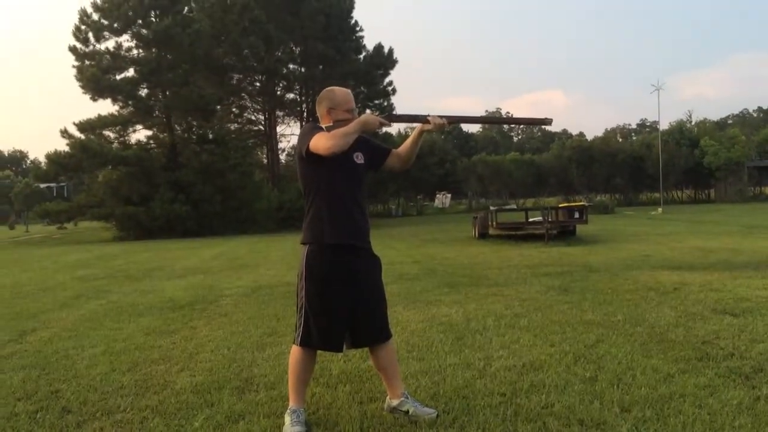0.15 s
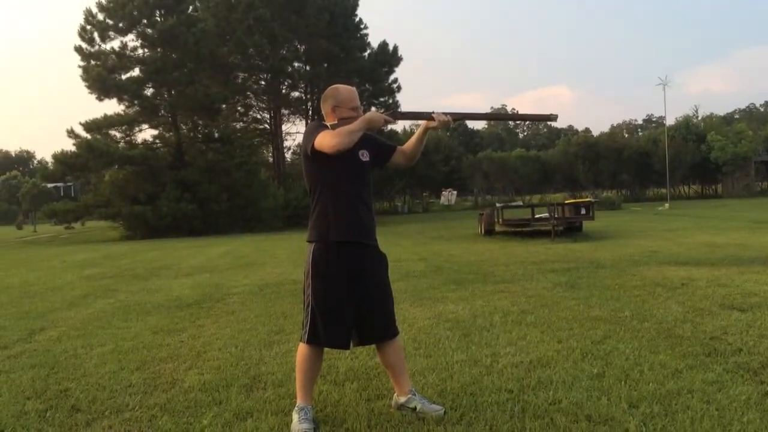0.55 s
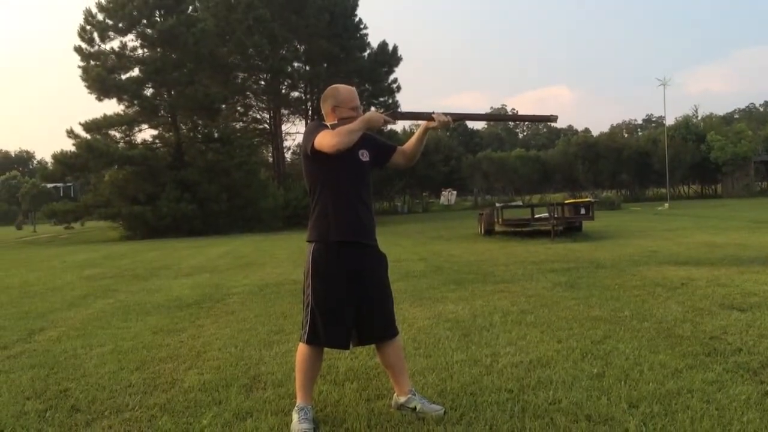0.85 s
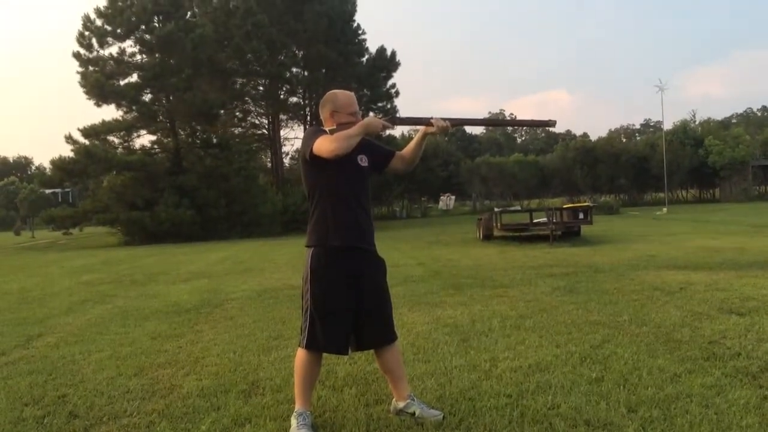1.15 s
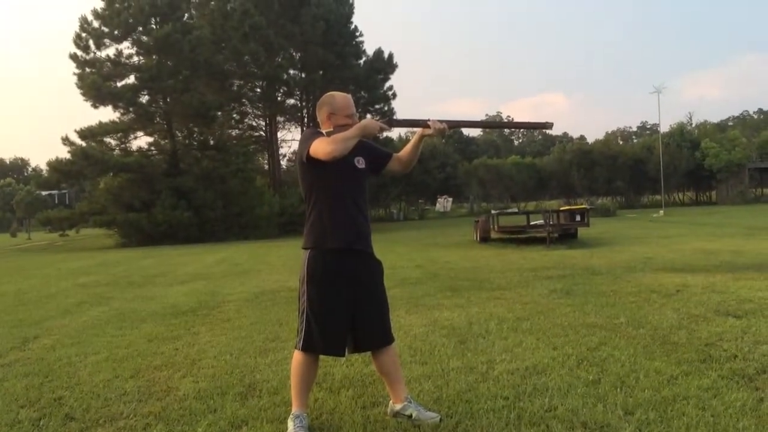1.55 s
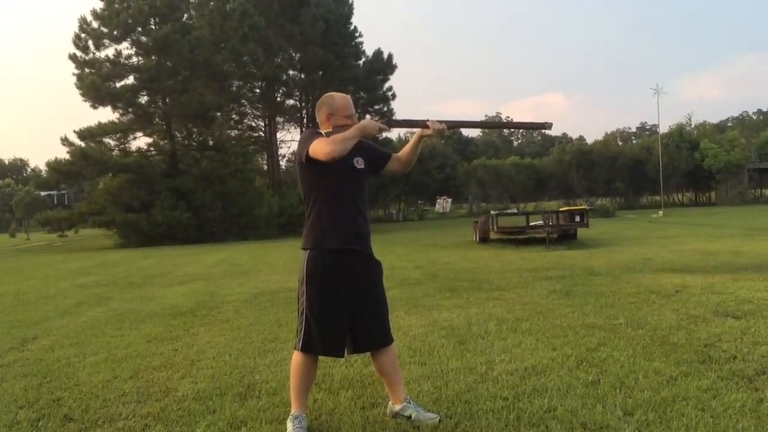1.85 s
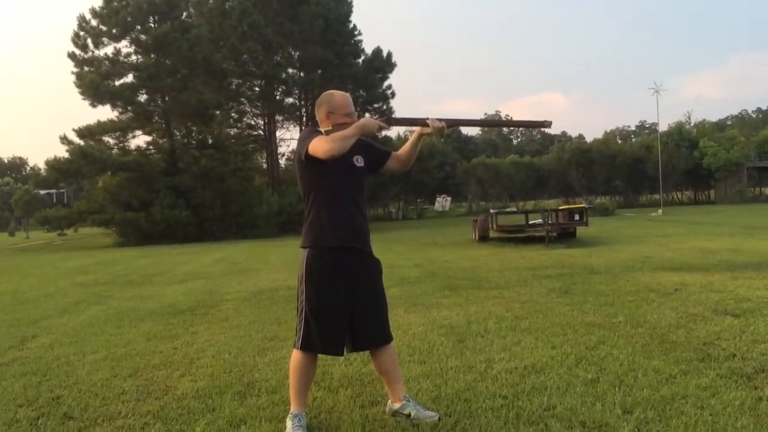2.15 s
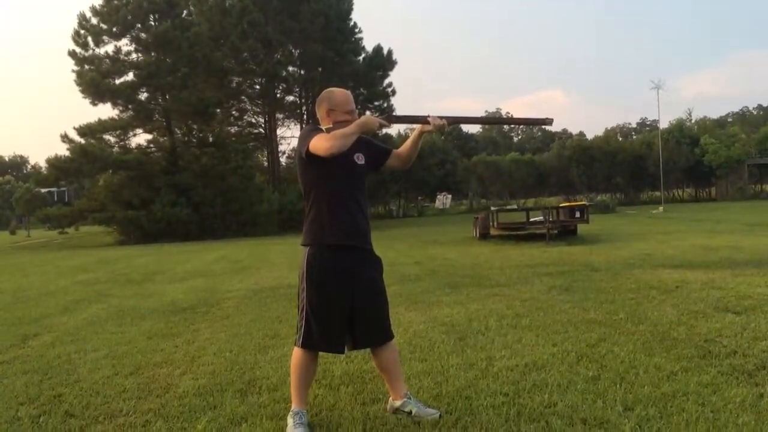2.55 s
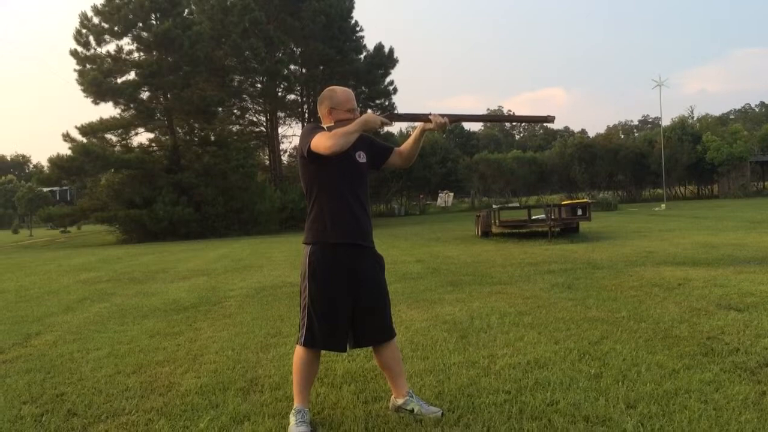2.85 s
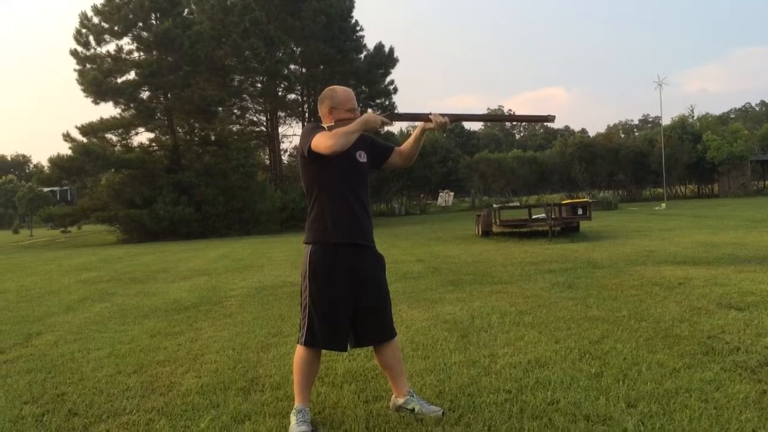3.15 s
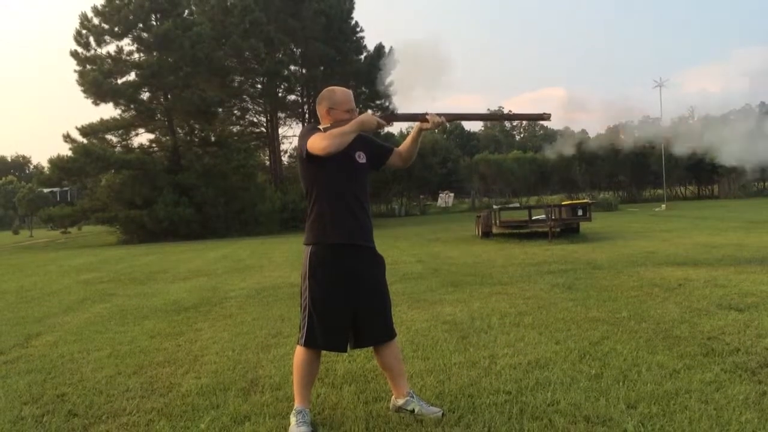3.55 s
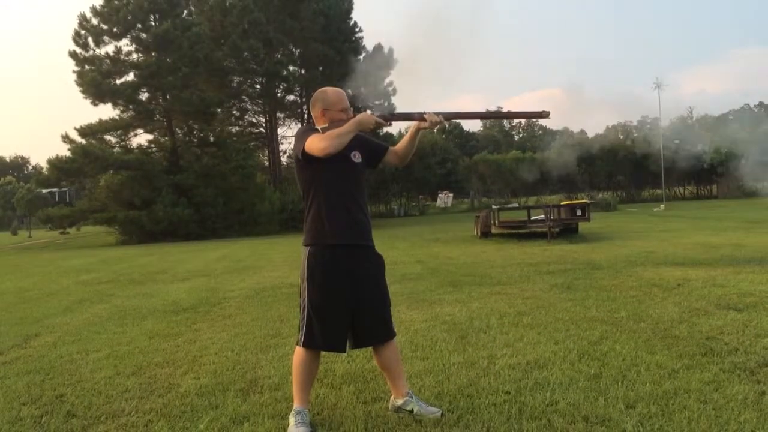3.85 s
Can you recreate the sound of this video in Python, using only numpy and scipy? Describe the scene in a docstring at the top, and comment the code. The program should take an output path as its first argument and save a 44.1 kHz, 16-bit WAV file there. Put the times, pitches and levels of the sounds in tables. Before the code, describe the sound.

One loud flintlock rifle shot with a short echo breaks faint outdoor insect noise.

```python
"""A flintlock rifle is fired on a quiet summer lawn, a few metres away.
First, insects hiss and trill over a low outdoor rumble, with faint chirps; one buzzes close by.
At 2.7 s the trigger ticks. Near 3.5 s the flint strikes steel and the priming powder fizzes.
A pop comes from the touch hole, then the main charge goes off with a burst of gas from the muzzle.
The blast comes back as separate slaps from things nearby and as a roll from the tree line."""
import sys
import numpy as np
from scipy import signal
from scipy.fft import rfft, irfft
from scipy.io import wavfile

SR = 44100
rng = np.random.default_rng(int(sys.argv[2]) if len(sys.argv) > 2 else 0)


def int16_out(signal):
    """Quantize to a 16-bit WAV file."""
    q = np.round(np.clip(np.atleast_2d(signal).T, -1, 1) * 32767)
    wavfile.write(sys.argv[1], SR, q.astype(np.int16))


N = 176400
T = np.arange(N) / SR
HZ = np.fft.rfftfreq(N, 1 / SR)


def amp(db):
    """Turns decibels into a number to multiply by."""
    return 10 ** (np.asarray(db) / 20)


def unit(x):
    """Scales a sound to an average (rms) size of one."""
    return x / np.sqrt(np.mean(x ** 2) + 1e-20)


def gain_at(points, hz):
    """Looks up how strong each frequency is in a table of f/Hz, level/dB."""
    f, db = np.transpose(points)
    return amp(np.interp(np.log(hz + 1), np.log(f + 1), db))


def level(points):
    """Loudness over time from a table of t/s, level/dB; silent before and after."""
    s, db = np.transpose(points)
    return amp(np.interp(T, s, db, left=-140, right=-140))


def noise(gain):
    """Noise whose mix of low and high frequencies follows gain."""
    return unit(irfft(rfft(rng.standard_normal(N)) * gain, N))


def band(hz, octaves):
    """Noise gathered around one frequency."""
    return noise(np.exp(-.5 * (np.log2((HZ + 1) / hz) / octaves) ** 2))


def wander(seconds):
    """A smooth random wobble; more seconds make it slower."""
    return noise(np.exp(-np.minimum((HZ * seconds) ** 2, 50)))


def swell(centre, width):
    """A smooth rise and fall around one moment."""
    return np.exp(-.5 * np.minimum(((T - centre) / width) ** 2, 100))


def burst(start, decay):
    """A sudden start that dies away."""
    return (T >= start) * np.exp(-np.clip((T - start) / decay, 0, 50))


def ring(start, hz, t60):
    """One note of a struck object, fading by 60 dB in t60 seconds."""
    return burst(start, t60 / np.log(1000)) * np.sin(2 * np.pi * hz * (T - start))


def high_pass(x, hz, order):
    """Takes away the bass below hz."""
    return signal.sosfilt(signal.butter(order, hz, "highpass", fs=SR, output="sos"), x)


# tone of the outdoor rumble: f/Hz, relative level/dB
RUMBLE_TONE = [(20, -14.5), (40, -6.5), (64, 1), (114, 0.5), (207, -8.5), (350, -17), (593, -29),
               (1000, -29.5), (1800, -30), (2730, -34.5), (4500, -38.5), (6000, -37.5), (7800, -63)]
# tone of the thin hiss: f/Hz, relative level/dB
HISS_TONE = [(4000, -17), (5500, -1.5), (10500, 6), (11700, -22), (12700, 1), (15000, 3), (16000, -8)]
def open_air():
    """The open air rumbles low, with a thin hiss on top."""
    return amp(-59) * noise(gain_at(RUMBLE_TONE, HZ)) + amp(-80) * noise(gain_at(HISS_TONE, HZ))


# tone of many insects together: f/Hz, relative level/dB
CHORUS_TONE = [(5600, -38), (6200, -15), (6600, -9), (7000, 3.5), (7400, 0), (7800, 3.5), (8300, 0),
               (8800, -12.5), (9600, -4), (10500, -3.5), (10950, -17), (11300, -51)]
def insect_chorus():
    """Many insects blend into one high, shimmering hiss."""
    shimmer_db = 0.68 * wander(.012) + 0.45 * wander(.3)
    return noise(gain_at(CHORUS_TONE, HZ)) * amp(-61 + shimmer_db)


# loudness of a far trill: t/s, level/dB
TRILL_LEVELS = [(0, -74), (0.35, -82), (0.75, -78), (1.05, -82.5), (1.7, -83.5), (2.2, -88.5), (3.4, -87.5)]
def trill():
    """A far trill flutters and slowly grows fainter."""
    flutter = amp(1.5 * wander(0.055))
    return level(TRILL_LEVELS) * band(hz=3650, octaves=0.19) * flutter


# distant chirps: t/s, width/s, level/dB, f/Hz, spread/octaves
FAR_CHIRPS = [(0.275, 0.016, -70, 2500, 0.48), (0.508, 0.029, -77, 3100, 0.36),
              (0.69, .016, -74, 2980, 0.42), (0.895, 0.018, -75, 4230, .08),
              (1.552, 0.011, -69.5, 2980, 0.14), (2.178, 0.011, -75, 2600, 0.38),
              (2.49, 0.016, -71, 2540, 0.15), (2.858, 0.0088, -66, 2900, 0.23),
              (3.321, 0.013, -71, 2750, .26)]
def chirps():
    """Each faint chirp is a short swell of high noise with a lower rasp."""
    rasp = amp(-5) * band(hz=2080, octaves=0.64)
    return sum(amp(db) * swell(s, width) * (band(hz, octaves) + rasp)
               for s, width, db, hz, octaves in FAR_CHIRPS)


# one insect flying close by: t/s, wingbeat f/Hz, level/dB
FLIGHT = [(0.62, 229, -87), (0.72, 222.6, -73.5), (0.82, 227.3, -74.5), (0.9, 231.4, -75.5),
          (0.98, 226.4, -73.5), (1.12, 229, -76), (1.17, 227, -73), (1.28, 230, -77), (1.35, 225, -75.5),
          (1.46, 218, -83)]
# tone of its wings: f/Hz, relative level/dB
WING_TONE = [(2800, -20), (3400, -8), (3650, -4.5), (3900, -13), (4130, -1), (4350, -1.5), (4600, -10),
             (4800, -11), (5030, -5), (5600, -21)]
def insect_buzz():
    """Beating wings make high overtones, each swelling and fading as the insect moves."""
    s, hz, db = np.transpose(FLIGHT)
    wingbeat_hz = np.interp(T, s, hz) * (1 + .0035 * wander(.015))
    phase = 2 * np.pi * np.cumsum(wingbeat_hz) / SR
    tone = np.zeros(N)
    for k in range(14, 24):  # overtones: whole multiples of the wingbeat
        strength = gain_at(WING_TONE, k * hz.mean()) * amp(2.5 * wander(.08))
        tone += strength * np.sin(k * phase + 2 * np.pi * rng.random())
    return level(list(zip(s, db))) * unit(tone)


def trigger(start_s=2.719):
    """A small tick leaves a spring ringing."""
    tick = amp(-59.5) * burst(start_s, decay=0.0057) * band(hz=1700, octaves=.9)
    return tick + amp(-53) * ring(start_s, hz=1053, t60=0.17)


# flint hitting and steel snapping open: t/s, tick level/dB, ring level/dB, decay/s
LOCK_HITS = [(3.4732, -21, -37, 0.0024), (3.478, -23.5, -38, 0.0023), (3.4821, -13.5, -14, 0.0017),
             (3.4831, -17, -9.5, 0.0014), (3.4849, -15.5, -15, 0.0025), (3.4886, -26.5, -17.5, 0.0058)]
# notes the lock and stock ring with: f/Hz, relative level/dB, time to fade 60 dB/s
LOCK_NOTES = [(540, -14.5, 0.047), (840, -36, .025), (1050, -19, 0.035), (1220, -7, 0.046),
              (2064, 6, 0.037), (2440, -11, 0.049), (2804, 0.5, 0.022), (3910, -9, 0.033)]
# tone of the metal ticks: f/Hz, relative level/dB
METAL_TONE = [(300, -26), (1000, 4.5), (3000, -3), (5000, -10.5), (7200, 3), (8300, -3), (10000, 3.5),
              (12000, -1.5), (14500, 1), (16000, -0.5)]
def lock():
    """In the lock (the firing mechanism) the flint swings, scrapes steel and sets the rifle ringing."""
    hiss = noise(gain_at(METAL_TONE, HZ))
    ticks, knocks = np.zeros(N), np.zeros(N)
    for s, tick_db, ring_db, decay in LOCK_HITS:
        ticks += amp(tick_db) * burst(s, decay) * hiss
        knocks[round(s * SR)] += amp(ring_db)
    body = sum(amp(db) * ring(0, hz, t60) for hz, db, t60 in LOCK_NOTES)[:SR // 8]
    ringing = signal.oaconvolve(knocks, body / abs(body).max())[:N]  # each knock starts all the notes
    touching = T > LOCK_HITS[0][0]
    scrape = amp(-29) * touching * swell(3.479, 0.0033) * band(hz=2360, octaves=0.31)
    swing = amp(-62) * swell(3.464, 0.0058) * band(hz=2600, octaves=0.55)
    return high_pass(swing + ticks + ringing + scrape, hz=480, order=4)


# loudness of the burning powder: t/s, level/dB
FIZZ_LEVELS = [(3.48, -70), (3.492, -41), (3.51, -51), (3.535, -46), (3.552, -42), (3.562, -51),
               (3.572, -29), (3.59, -72)]
# tone of the burning powder: f/Hz, relative level/dB
FIZZ_TONE = [(59, -31), (100, -4), (1390, -13), (1550, -6), (5530, -22), (6990, -19), (12700, -15.5),
             (15000, -25), (16000, -40)]
def priming():
    """A pinch of powder fizzes as it burns, lighting the main charge."""
    return level(FIZZ_LEVELS) * noise(gain_at(FIZZ_TONE, HZ))


# pulses of air pressure: t/s, width/s, boom f/Hz, boom level/dB, crack level/dB, tick level/dB
PULSES = [(3.5636, 0.0017, 218, -27, -33, -44), (3.6093, 0.00057, 350, -23, -13.5, -33),
          (3.6347, 0.0028, 330, -42, -28, -34), (3.659, 0.0036, 333, -27.5, -24, -31),
          (3.6676, .0012, 420, -21, -15.5, -24), (3.673, 0.0033, 343, -26.5, -42, -50),
          (3.6988, 0.00059, 525, -4, -21, -21), (3.7099, 0.0014, 387, -16.5, -36, -50),
          (3.7198, 0.0015, 677, -11.5, -28, -50), (3.7212, 0.0057, 174, -19, -43, -58),
          (3.7318, 0.0014, 286, -12, -18.5, -31), (3.739, 0.001, 303, -28, -48, -50),
          (3.759, 0.0018, 400, -29, -33, -38), (3.7863, 0.002, 370, -22, -31, -45),
          (3.857, 0.002, 416, -30, -37, -34.5), (3.897, 0.0084, 258, -42, -34, -42.5),
          (3.95, 0.0041, 172, -22.5, -33, -61), (3.9597, 0.0047, 152, -18.5, -37, -62),
          (3.963, 0.0052, 319, -17, -31, -62), (3.982, .002, 335, -18.5, -27, -55),
          (3.9894, 0.0017, 294, -18.5, -29.5, -55)]
# tone of their crack: f/Hz, relative level/dB
CRACK_TONE = [(500, -12.5), (1500, 4.5), (3000, 3.5), (4500, -6), (8000, -17.5), (12000, -25), (16000, -33)]
# tone of their bright tick: f/Hz, relative level/dB
TICK_TONE = [(1500, -36), (4200, 3.5), (6000, -3), (9000, 1.5), (14500, -10.5), (16000, -10)]
def slaps():
    """One pulse leaves the touch hole (a small hole in the barrel); the rest are nearby echoes."""
    crack, tick = noise(gain_at(CRACK_TONE, HZ)), noise(gain_at(TICK_TONE, HZ))
    out = np.zeros(N)
    for s, width, hz, boom_db, crack_db, tick_db in PULSES:
        boom = -amp(boom_db) * np.sin(2 * np.pi * hz * (T - s))
        out += swell(s, width) * (boom + amp(crack_db) * crack + amp(tick_db) * tick)
    return out


SHOT_S = 3.5702
# tone of the gas leaving the muzzle: f/Hz, relative level/dB
GAS_TONE = [(88, -14), (150, -3), (275, -18.5), (348, -6), (566, -3), (716, -5), (871, -7), (998, -6.5),
            (1830, -1.5), (3290, -7), (5050, -8.5), (14500, -8), (16000, -24)]
# tone of the thump under it: f/Hz, relative level/dB
THUMP_TONE = [(40, -9), (110, 9.5), (250, -5.5), (600, -35)]
def blast(attack_s=0.0012, hold_s=0.019, fall_db_per_s=248, swing_hz=58.3):
    """Gas bursts raggedly from the muzzle, holds briefly and fades, over a deep swing of pressure."""
    age = T - SHOT_S
    attack = np.clip(age / attack_s, 0, 1)
    gas = unit(noise(gain_at(GAS_TONE, HZ)) * amp(2.5 * wander(0.0015)))  # the fast wobble crackles
    gas *= amp(-13.5 - fall_db_per_s * np.maximum(age - hold_s, 0))
    swing = amp(-23) * np.sin(2 * np.pi * swing_hz * age)
    thump = amp(-30.5) * noise(gain_at(THUMP_TONE, HZ))
    return attack * (gas + swell(SHOT_S + 0.011, .014) * (swing + thump))


# echo from the trees, band by band: f/Hz, starting level/dB, fall/(dB per s; negative means it grows)
TREE_ECHO = [(60.4, -50.5, -11), (166, -39.5, -14.5), (387, -36.5, 6), (940, -44, 3.5), (1760, -39, -2.5),
             (3430, -39.5, 5), (6100, -36, 23.5), (11000, -34.5, 56)]
def tree_roll(rise_s=0.032):
    """The trees scatter the shot into a patchy roll whose treble fades while its bass grows."""
    age = np.maximum(T - SHOT_S, 0)
    bands = sum(amp(db - fall * age) * band(hz, octaves=0.51) for hz, db, fall in TREE_ECHO)
    patches = amp(2 * wander(0.019))
    return np.minimum(age / rise_s, 1) * bands * patches


def scene():
    """Adds everything into one channel; blast and roll dip briefly between the loudest slaps."""
    lawn = open_air() + insect_chorus() + trill() + chirps() + insect_buzz()
    dip = amp(-5.5 * swell(3.712, 0.012))
    rifle = trigger() + lock() + priming() + slaps() + (blast() + tree_roll()) * dip
    return (lawn + rifle)[None]


def record(dry):
    """A small microphone loses the deepest bass, rounds off loud peaks and cuts the highest treble."""
    ceiling = amp(-.5)
    rounded = ceiling * np.tanh(high_pass(dry, hz=48.7, order=3) / ceiling)
    treble_cut = signal.firwin(255, cutoff=15600, window=("kaiser", 9), fs=SR)
    return signal.oaconvolve(rounded, treble_cut[None], "same")


dry = scene()
out = record(dry)
int16_out(out)
```